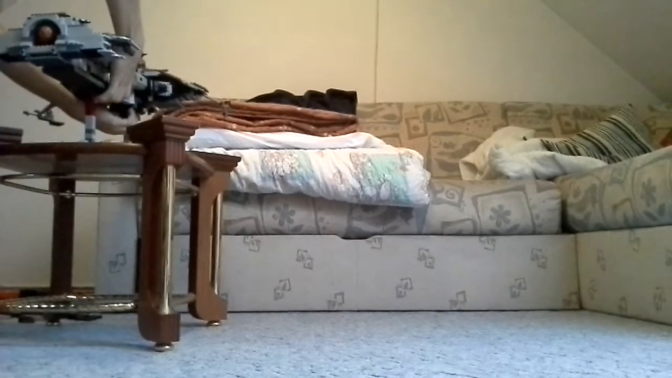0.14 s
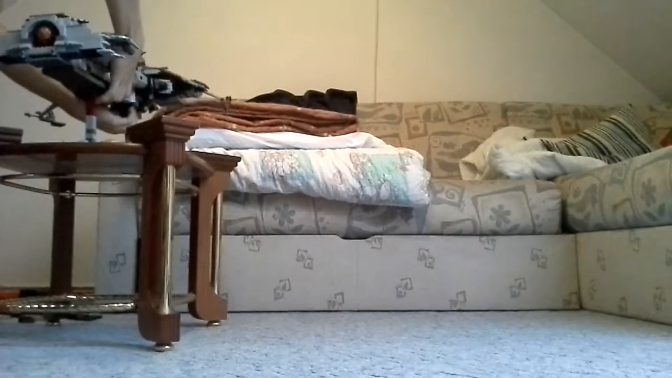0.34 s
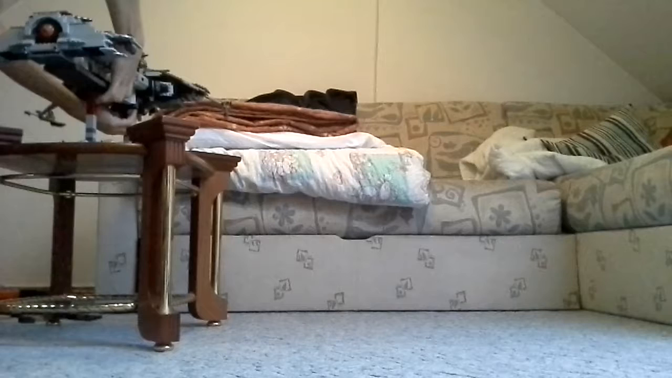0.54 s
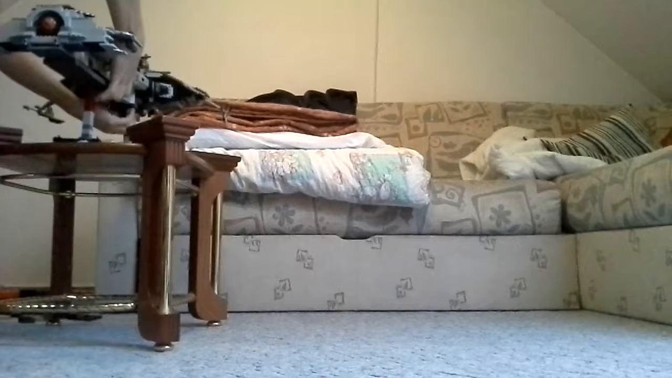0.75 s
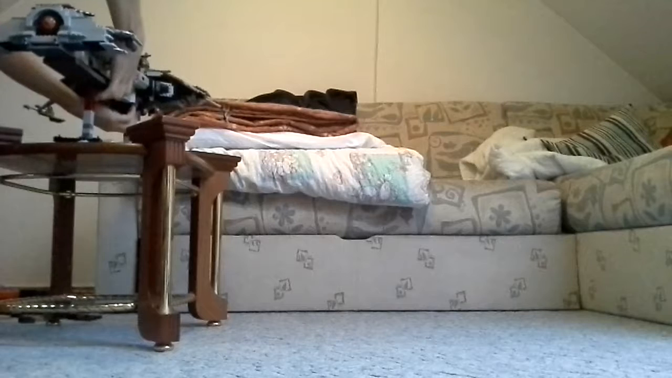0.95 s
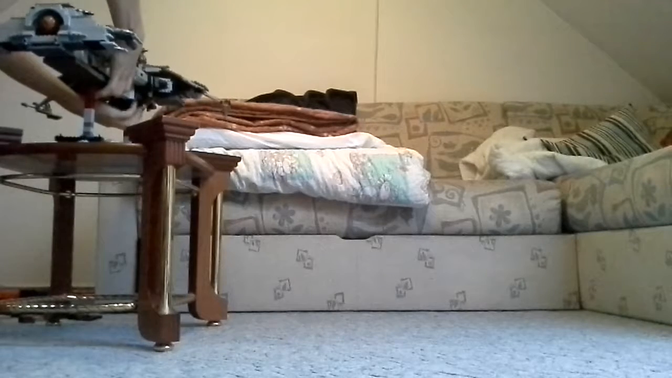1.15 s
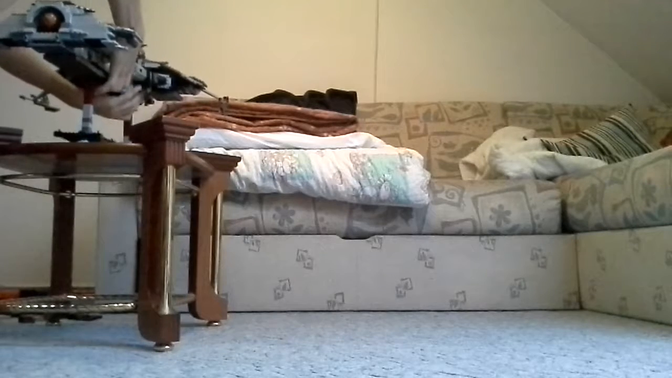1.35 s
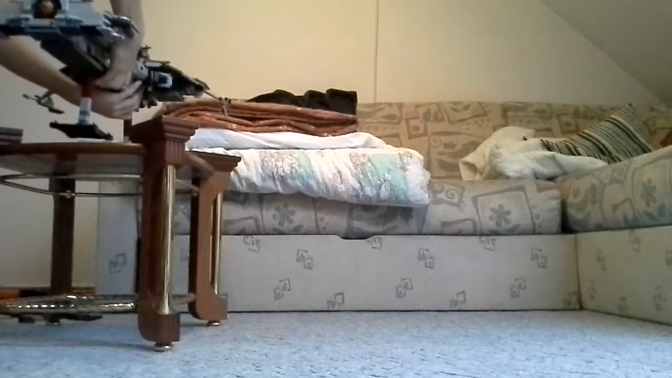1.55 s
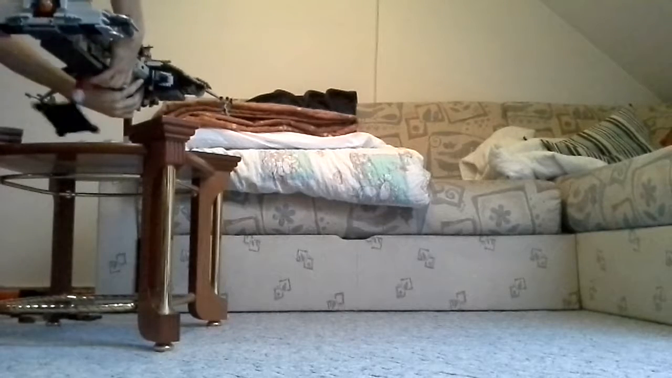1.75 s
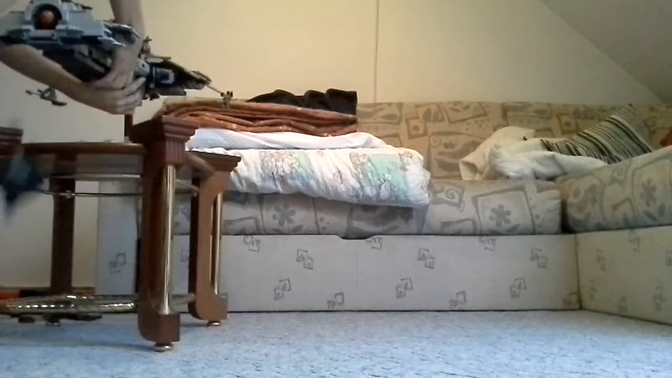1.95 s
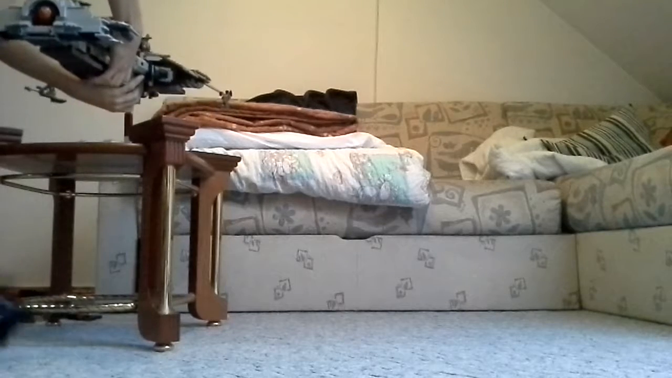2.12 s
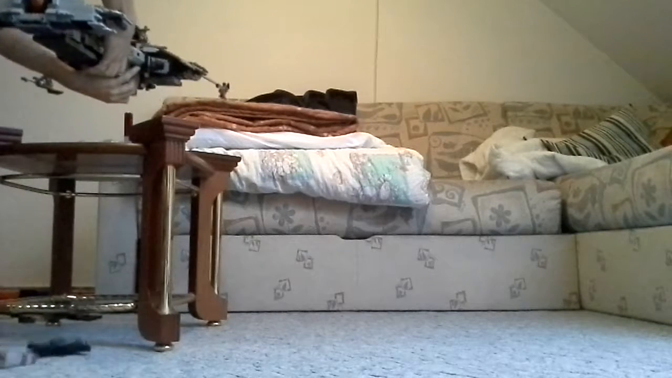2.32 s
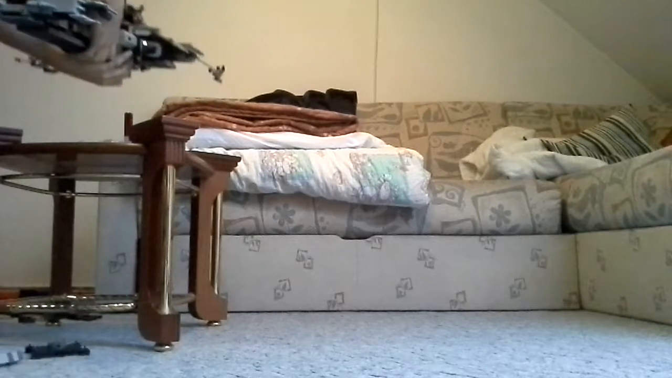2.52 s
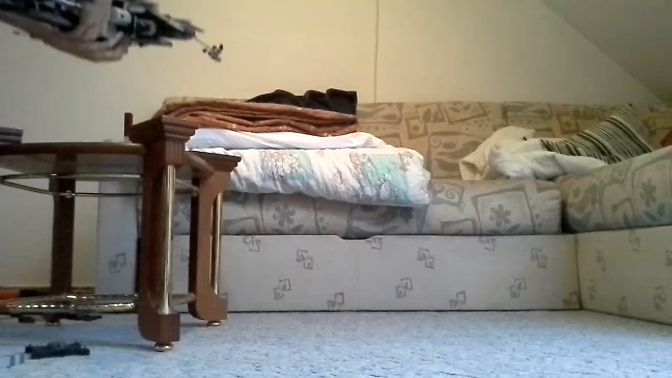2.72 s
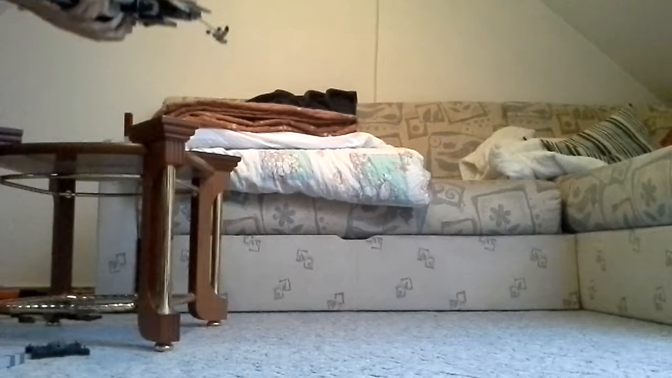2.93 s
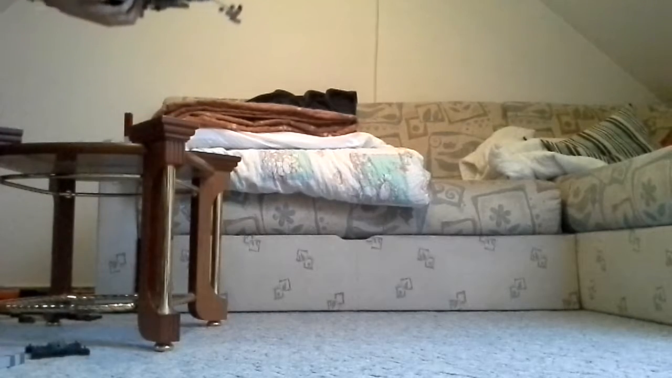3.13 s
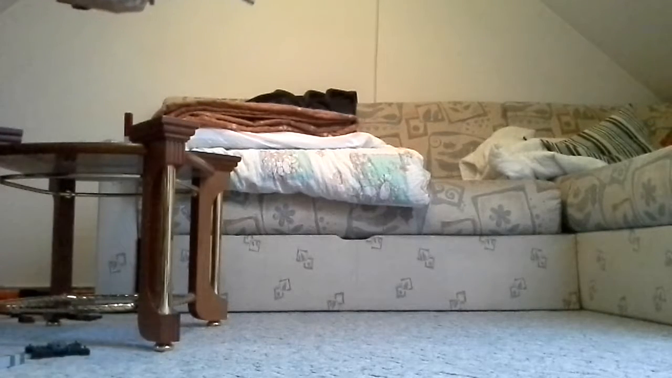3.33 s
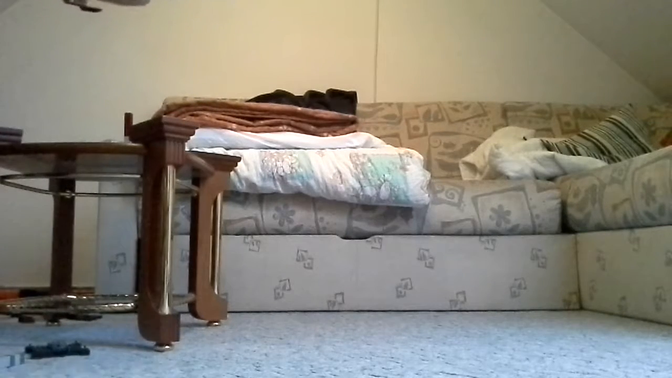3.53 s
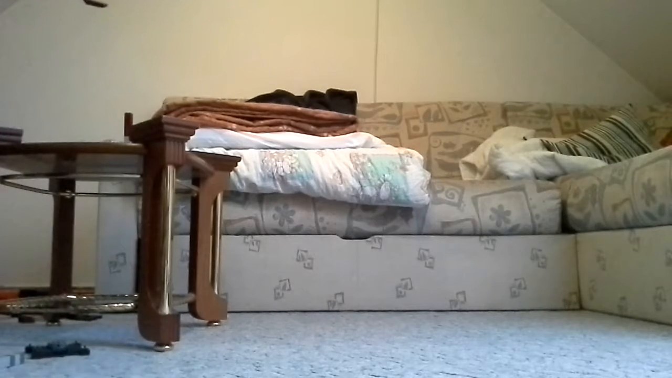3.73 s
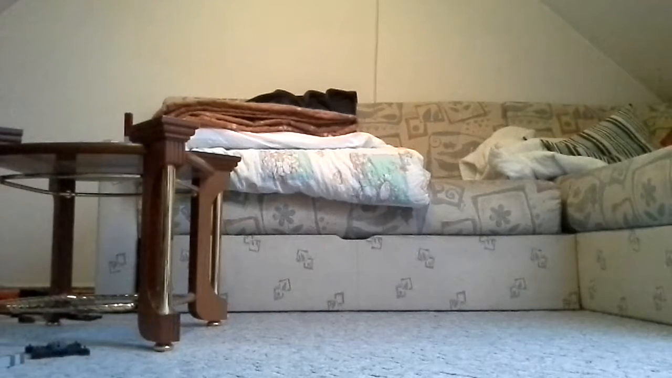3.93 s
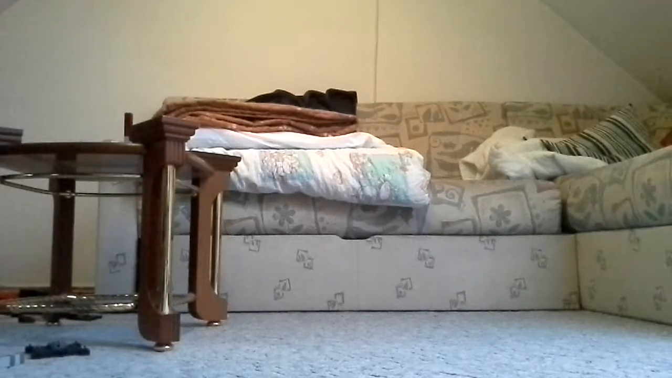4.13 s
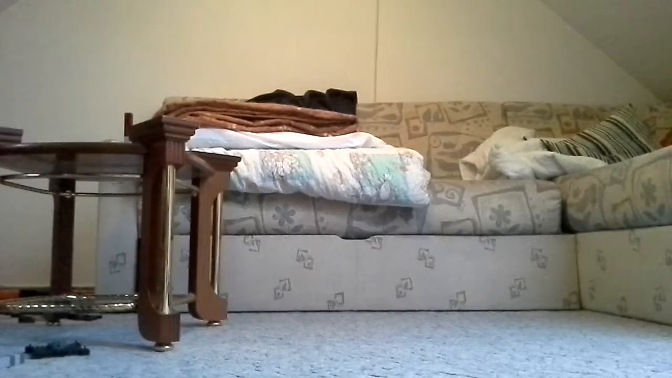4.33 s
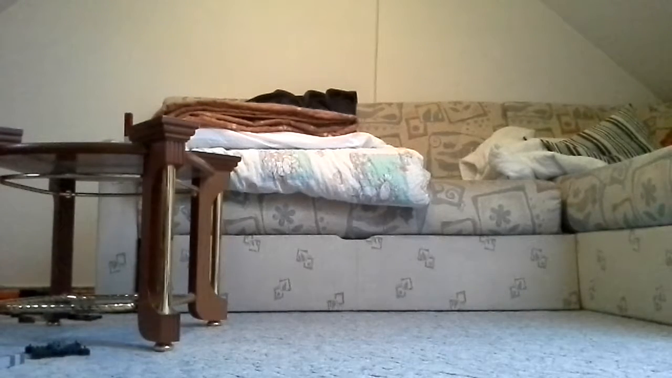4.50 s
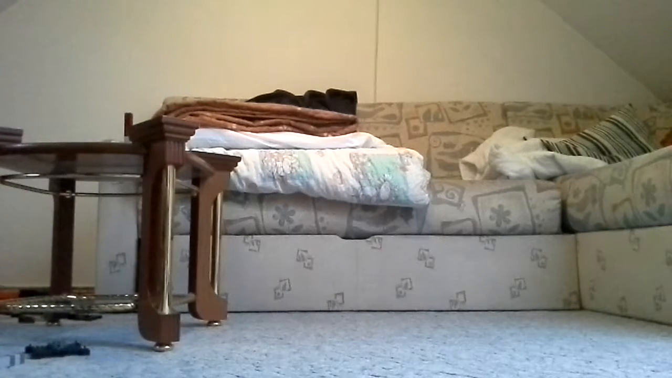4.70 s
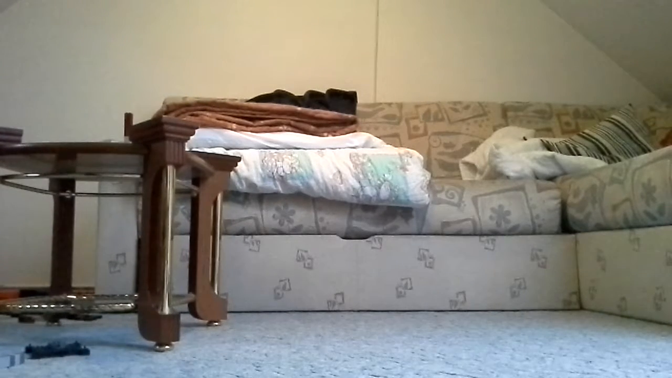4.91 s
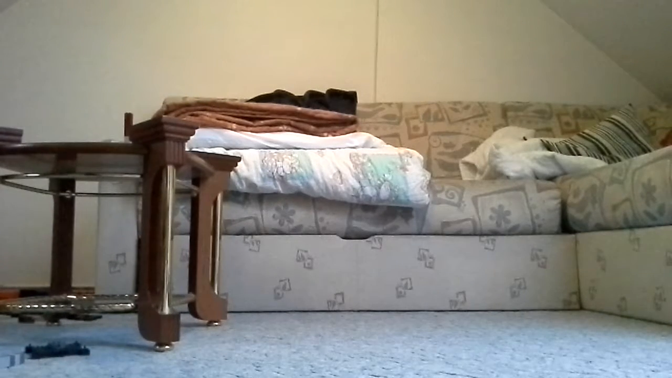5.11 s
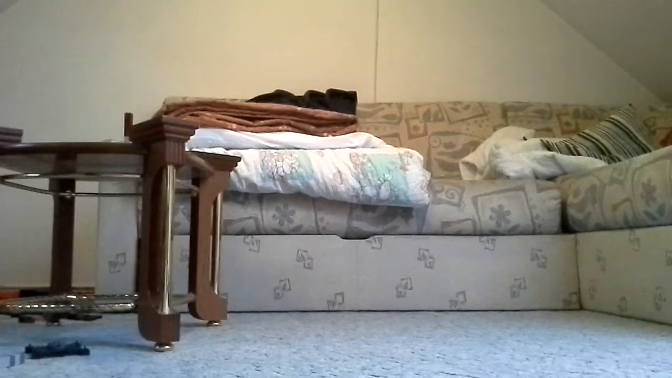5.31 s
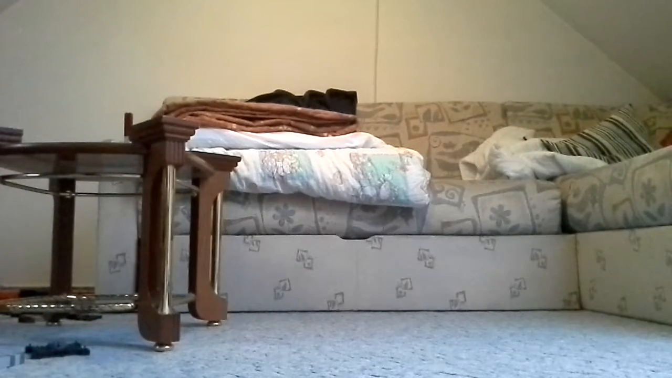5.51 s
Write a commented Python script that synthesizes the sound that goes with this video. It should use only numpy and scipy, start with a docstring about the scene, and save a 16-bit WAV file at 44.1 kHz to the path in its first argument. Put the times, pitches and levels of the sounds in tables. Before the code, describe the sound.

A faint creak, then a bright hard clatter of plastic bricks on a table, fading in quick softer knocks. A quiet gap follows, then another sharp clatter and a heavy, boxy thump on carpet with loose bricks rattling. Afterwards only small plastic ticks, creaks and two brighter snaps remain, over a swelling and sinking hiss and low room rumble, in mono with short indoor echoes.

```python
"""A hiss swells and sinks over a low rumble: shaped noise, the hiss riding a level curve.
After a faint creak, a large model of plastic bricks crashes against a table and rocks to rest.
A section snaps off, clatters on the table top, drops to the carpeted floor and bounces.
The rest creaks and clicks as it is lifted away. Each blow is a crush and a shower of small contacts,
rung through plate resonances and balanced in frequency bands with a small furnished room's echoes."""
import sys
import numpy as np
from scipy import signal
from scipy.fft import rfft, irfft
from scipy.io import wavfile

SR = 44100
rng = np.random.default_rng(int(sys.argv[2]) if len(sys.argv) > 2 else 0)


def to_wav(s):
    """Save 16-bit WAV."""
    ch = np.atleast_2d(s).T  # columns
    pcm = np.round(np.clip(ch, -1, 1) * 32767)  # PCM
    wavfile.write(sys.argv[1], SR, pcm.astype(np.int16))


N = 249606
AGE = np.arange(int(.6 * SR)) / SR  # time since the start of a sound, s


def from_db(db):
    """Decibels to gain."""
    return 10 ** (np.asarray(db) / 20)


def rms(x):
    """Root mean square."""
    return np.sqrt(np.mean(x ** 2) + 1e-20)


def dying(t60):
    """An envelope that falls 60 dB in t60 seconds."""
    return from_db(-60 * AGE / t60)


def rising(rise_s):
    """A soft onset that closes in on 1 with time constant rise_s."""
    return 1 - np.exp(-AGE / rise_s)


def tone(hz, t60):
    """A dying sine, as of one freely ringing mode."""
    return np.sin(2 * np.pi * hz * AGE) * dying(t60)


def add(out, s, sound):
    """Mix a sound in from time s."""
    start = round(s * SR)
    out[start:start + len(sound)] += sound[:N - start]


def resonate(x, hz, width_hz):
    """A two-pole resonance with gain 1 on top."""
    radius = np.exp(-np.pi * width_hz / SR)
    poles = [1, -2 * radius * np.cos(2 * np.pi * hz / SR), radius * radius]
    return signal.lfilter([1, 0, -1], poles, x + 1e-18) * (1 - radius * radius) / 2


def coloured_noise(spectrum):
    """Steady noise of a given spectrum, rms 1."""
    hz, db = np.transpose(spectrum)
    bins_hz = np.fft.rfftfreq(N, 1 / SR)
    shape = from_db(np.interp(np.log(bins_hz + 1), np.log(hz), db))
    noise = irfft(rfft(rng.standard_normal(N)) * shape, N)
    return noise / rms(noise)


CONTACTS_PER_S = 700


def rattle(modes, rattle_s, loose, crush_s=0.0013, crush=.3):
    """A brief crushing contact, then a dying shower of small ones as loose bricks jostle; all ring the modes."""
    hits = rng.random(len(AGE)) < CONTACTS_PER_S / SR
    shower = hits * rng.uniform(-0.9, 1, len(AGE))
    clicks = loose * shower * np.exp(-AGE / rattle_s)
    clicks += crush * rng.standard_normal(len(AGE)) * np.exp(-AGE / crush_s)
    return clicks + sum(from_db(db) * resonate(clicks, hz, width_hz) for hz, width_hz, db in modes)


def note(hz, db, t60):
    """The struck piece's own pitch, with an energy of db."""
    ring = tone(hz, t60) * rising(0.0013)
    return from_db(db) * ring / np.linalg.norm(ring)


# registers of a blow: low f/Hz, high f/Hz, room t60/s
THUMP = (115, 260, 0.25)
THUD = (250, 480, .45)
TOCK = (500, 998, 0.27)
KNOCK = (1100, 2640, 0.3)
CLACK = (2370, 6300, 0.27)
SNAP = (6300, 9000, .28)
CRACK = (9500, 13000, 0.074)


def blow(levels, contacts, ring, room_db):
    """Contacts heard through the room, plus a ring; levels are (register, rms dB over the first 25 ms)."""
    echoes = rng.standard_normal(len(AGE)) * rising(0.0002)  # each spot has its own echoes
    early, out = AGE < .025, 0
    for (low_hz, high_hz, t60), db in levels:
        room = echoes * dying(t60)
        room *= from_db(room_db) / np.linalg.norm(room)
        room[0] = 1  # the direct path
        wet = signal.fftconvolve(contacts, room)[:len(AGE)]
        band = signal.butter(N=4, Wn=[low_hz, high_hz], btype="band", fs=SR, output="sos")
        heard = signal.sosfilt(band, wet / np.linalg.norm(wet) + ring)
        out = out + from_db(db) * heard / rms(heard[early])
    return out


# level curve of the hiss, before its overall lift: t/s, level/dB
HISS_CURVE = [(0.0, -65.5), (0.14, -71.5), (0.33, -81), (0.52, -59.5), (0.72, -61.5), (1.5, -75),
              (1.73, -76), (2.0, -62), (2.27, -64), (2.88, -62.5), (3.14, -68.5), (3.37, -67), (3.7, -64),
              (3.99, -69.5), (4.49, -65), (4.92, -69.5), (5.42, -77), (5.66, -82)]
# relative spectrum of the hiss: f/Hz, level/dB
HISS_SPECTRUM = [(76, -37), (130, -0.5), (193, 1), (356, -3.5), (594, -6.5), (682, -8.5), (1390, -12),
                 (2020, -15.5), (2230, -16.5), (2660, -18.5), (4440, -16), (6210, -19.5), (14500, -19)]
# relative spectrum of the room rumble: f/Hz, level/dB
RUMBLE_SPECTRUM = [(15, -39), (25, -9.5), (48, -11), (102, 4), (121, 2), (140, -12), (195, -21), (263, -26),
                   (900, -39), (1170, -58), (1980, -120)]


def background(hiss_db=11, rumble_db=-66):
    """A steady low room rumble, and broad noise whose gain follows the hiss curve."""
    s, level_db = np.transpose(HISS_CURVE)
    swell = from_db(np.interp(np.arange(N) / SR, s, level_db) + hiss_db)
    hiss = swell * coloured_noise(HISS_SPECTRUM)
    return hiss + from_db(rumble_db) * coloured_noise(RUMBLE_SPECTRUM)


# brick joints slipping in the hand:
# t/s, clack level/dB, brightness/dB (clack over knock), ping offset of the freed brick/dB, rattle t/s
JOINT_SLIPS = [(0.015, -56, 3, -21, 0.018), (1.275, -68, 3, -18, .02), (2.661, -58.5, 4, -27, 0.011),
               (2.7095, -56.5, 0.5, -20, 0.0066), (2.922, -53.5, 7.5, -24, .028),
               (3.305, -57.5, -2, -24, .028), (3.4867, -43, 12, -7, .012), (3.6178, -53, -0.5, -24, 0.011),
               (3.723, -53.5, 8.5, -23, 0.012), (3.823, -53, 8, -23, .032), (4.1251, -52.5, 5, -7, .012),
               (4.233, -49, 12, -12, .016), (4.365, -40.5, 14, -22, 0.017), (4.8845, -59.5, 6, -20, 0.016),
               (4.953, -50.5, 7, -22, .018), (5.035, -63, 3, -22, .014), (5.308, -64.5, 4, -21.5, .008)]
# resonances of single small bricks: f/Hz, width f/Hz, level/dB
SMALL_BRICK_MODES = [(743, 200, 5), (1750, 290, -1.5), (2410, 106, -5), (3000, 700, 1.5), (4150, 420, 10),
                     (4640, 160, 13.5), (5030, 72, 14.5)]
# ping of a freed brick: f/Hz, level/dB before the slip's own ping offset, t60/s
PING_MODES = [(2310, -8, .12), (4810, -3, .16), (4980, -3.5, .16)]


def creaks(tock_db=-5, snap_db=-12, crack_db=-4, typical_db=-52, brightening=0.16,
           swell_s=.006, slow_rattle_s=.03):
    """Studs slip in their sockets: quick slips tick, some with a clear ping; slow ones swell into a rustle."""
    out = np.zeros(N)
    for s, clack, bright, ping_db, rattle_s in list(JOINT_SLIPS) + slips():
        knock = clack - bright
        snap = clack + snap_db + brightening * (clack - typical_db)  # a harder slip is a brighter one
        levels = [(TOCK, knock + tock_db), (KNOCK, knock), (CLACK, clack),
                  (SNAP, snap), (CRACK, snap + crack_db)]
        ping = sum(note(hz, db + ping_db, t60) for hz, db, t60 in PING_MODES)
        contacts = rattle(SMALL_BRICK_MODES, rattle_s, loose=1.6, crush_s=0.0014, crush=0.27)
        swell = rising(swell_s * (rattle_s / slow_rattle_s) ** 4)
        add(out, s, swell * blow(levels, contacts, ping, room_db=5.0))
    return out


# plastic striking the table, levels before the register balance:
# t/s, level/dB, brightness/dB (clack lift), snap of a joint/dB against the level, note f/Hz, rattle t/s
TABLE_HITS = [(0.288, -58, 4, -1.5, 950, 0.018), (0.319, -46.5, -7.5, -20.5, 1050, 0.009),
              (0.3294, -25, 2, -13.5, 1000, 0.011), (0.3373, -24.5, 7, -14.5, 1495, 0.015),
              (0.476, -45, 3, -25, 1540, .026), (0.5036, -29.5, -5, -36, 1047, 0.01),
              (1.083, -59, -12, -19, 616, 0.015), (1.694, -67, 10.5, 0, 1936, 0.028),
              (1.7645, -47.5, 1.5, -11, 1220, .006), (1.777, -41, -1, -18.5, 1164, .018),
              (1.8473, -24.5, 6.5, -6, 618, .012), (1.886, -19, -5, -16, 1571, .011),
              (1.896, -23, -6, -18.5, 1535, 0.011)]
# resonances of the brick plates, also heard on the floor: f/Hz, width f/Hz, level/dB
PLATE_MODES = [(372, 53, -1), (650, 180, 1.5), (985, 380, 1.5), (1286.6, 180, 10), (1550, 200, 5.5),
               (1878, 39, 4), (2180, 200, 0.5), (3420, 1300, -3.5), (4355, 940, 14), (4600, 92, 6.5),
               (4860, 97, 9)]


def crashes(thump_db=-27, thud_db=-16.5, tock_db=-4.5, crack_db=-13, note_db=-12.5,
            thinning=.25, note_damping=.4, firm_rattle_s=.012):
    """Hard plastic on the hard table top: a corner hits bright and thin, a flat side is duller and rings more."""
    out = np.zeros(N)
    for s, db, bright, snap, note_hz, rattle_s in list(TABLE_HITS) + rocking():
        bass = db - thinning * snap  # a snapping joint moves little weight
        levels = [(THUMP, bass + thump_db), (THUD, bass + thud_db), (TOCK, db + tock_db), (KNOCK, db),
                  (CLACK, db + bright), (SNAP, db + snap), (CRACK, db + snap + crack_db)]
        ring = note(note_hz, note_db - note_damping * bright, t60=0.083)
        crush = .3 * firm_rattle_s / rattle_s  # the longer the rattle, the softer its first contact
        contacts = rattle(PLATE_MODES, rattle_s, loose=1.4, crush=crush)
        add(out, s, blow(levels, contacts, ring, room_db=3.0))
    return out


# first touch t/s, first gap t/s, and the factor from gap to gap
ROCK_START_S, ROCK_GAP_S, ROCK_SHRINK = .559, .086, .93
# first level and brightness, and what each touch loses of them
ROCK_DB, ROCK_LOSS_DB = -37, 5.5
ROCK_BRIGHT_DB, ROCK_DULLING_DB = -2.5, 2.2
ROCK_SNAP_DB, ROCK_NOTE_HZ, ROCK_RATTLE_S = -15.5, 1165, 0.023


def rocking(count=5):
    """The model rocks to rest: each touch comes sooner, softer and duller; rows like those of a crash."""
    gaps = ROCK_GAP_S * ROCK_SHRINK ** np.arange(count)
    times = ROCK_START_S + np.cumsum(gaps) - gaps
    rows = []
    for i, s in enumerate(times):
        level = ROCK_DB - ROCK_LOSS_DB * i
        bright = ROCK_BRIGHT_DB - ROCK_DULLING_DB * i
        rows.append((s, level, bright, ROCK_SNAP_DB, ROCK_NOTE_HZ, ROCK_RATTLE_S))
    return rows


# the section landing and bouncing, levels before the register balance:
# t/s, level/dB, brightness/dB (clack against thud), rattle t/s
FLOOR_HITS = [(2.141, -16.5, -7, 0.0064), (2.152, -26, 0, .016), (2.207, -32, 2, 0.022),
              (2.246, -25.5, -11, 0.04), (2.4, -47, 2, 0.0038), (2.4107, -32.5, -18, 0.0049)]
# long rings of the fallen section and the floor under it:
# f/Hz, level/dB against the thud before the ring lift, t60/s
SECTION_MODES = [(133, -16.5, 0.11), (232, -5, 0.36), (300, -20, 0.57), (352, -11.5, 0.17),
                 (408, -12.5, .3), (477.5, 9.5, 0.3), (695, -9.5, 0.14), (940, -6.5, 0.073),
                 (1370, -14.5, 0.2265), (2240, -20, 0.72), (4490, -23, 0.6), (4570, -23.5, .5)]
# the carpet's soft push: f/Hz, level/dB against the thud, t60/s
PUSH = (140, 3.1, 0.04)
# between the bounces a flat plate slaps down and rings: t/s, f/Hz, level/dB, t60/s
PLATE = (2.2195, 1286, -16, .12)


def landings(thump_db=-6, thud_db=-2.5, tock_db=-1.0, knock_db=-3, snap_db=-13, crack_db=-21,
             ring_db=3.0, knock_share=.55):
    """The section thuds on the carpet; its slow modes ring on while the bricks clatter."""
    out = np.zeros(N)
    push_hz, push_db, push_t60 = PUSH
    push = from_db(push_db) * tone(push_hz, push_t60) * rising(0.0089)
    no_note = np.zeros_like(AGE)  # the carpet damps the piece that touches it
    for s, thud, bright, rattle_s in FLOOR_HITS:
        # the carpet gives one compact push
        body = [(THUMP, thud + thump_db), (THUD, thud + thud_db), (TOCK, thud + tock_db)]
        thump = blow(body, rattle(PLATE_MODES, .009, loose=.2), no_note, room_db=-0.5)
        add(out, s, from_db(thud) * push + thump)
        # the bricks are shaken loose above it
        knock, clack = thud + knock_share * bright, thud + bright
        clatter = [(KNOCK, knock + knock_db), (CLACK, clack),
                   (SNAP, clack + snap_db), (CRACK, clack + crack_db)]
        add(out, s, blow(clatter, rattle(PLATE_MODES, rattle_s, loose=3.7), no_note, room_db=7.5))
    # only the first, full-weight landing bends the whole section
    s, thud = FLOOR_HITS[0][:2]
    rings = sum(from_db(db) * tone(hz, t60) for hz, db, t60 in SECTION_MODES)
    add(out, s, from_db(thud + ring_db) * rings * rising(0.016))
    s, hz, db, t60 = PLATE
    add(out, s, from_db(db) * tone(hz, t60) * rising(0.003))
    return out


CARRY_START_S, CARRY_END_S = 2.6, 4.6
SLIP_DB, SLIP_SPREAD_DB = -65, 2  # middle level, and the most it strays either way
SLIP_BRIGHT_DB, SLIP_PING_DB, SLIP_RATTLE_S = 1, -22, .03


def slips(count=7):
    """Faint slips, one at random in each equal step of the carrying, as rows like those of a creak."""
    step_s = (CARRY_END_S - CARRY_START_S) / count
    rows = []
    for i, (when, size) in enumerate(rng.random((count, 2))):
        s = CARRY_START_S + step_s * (i + when)
        level = SLIP_DB + SLIP_SPREAD_DB * (2 * size - 1)
        rows.append((s, level, SLIP_BRIGHT_DB, SLIP_PING_DB, SLIP_RATTLE_S))
    return rows


def scene():
    """All layers summed to one channel."""
    return (background() + creaks() + crashes() + landings())[None]


def record(dry, cutoff_hz=14650):
    """Peaks stop at full scale, then a steep low-pass cuts the top."""
    top = signal.ellip(14, .1, 100, cutoff_hz, fs=SR, output="sos")
    return signal.sosfilt(top, np.clip(dry, -1, 1))


dry = scene()
out = record(dry)
to_wav(out)
```